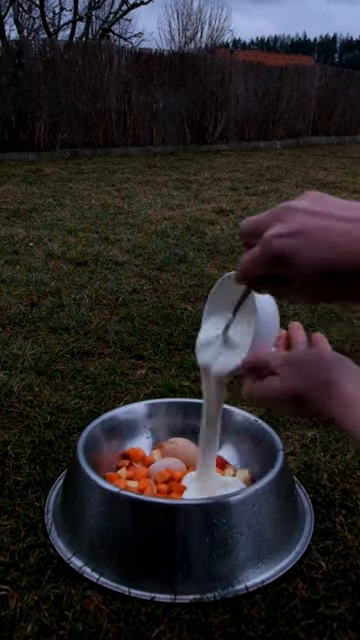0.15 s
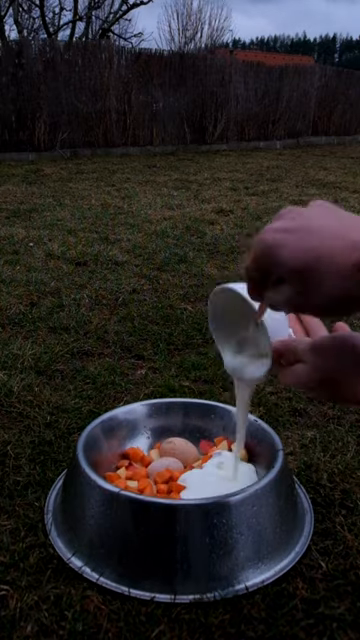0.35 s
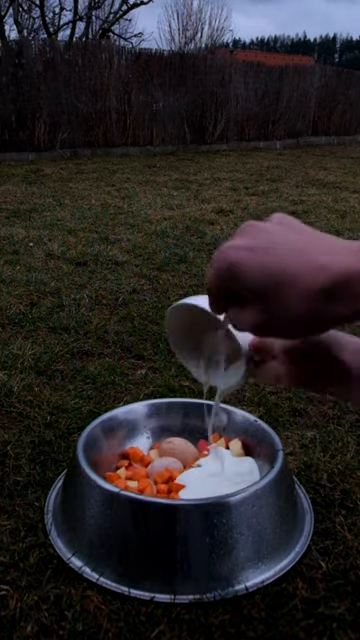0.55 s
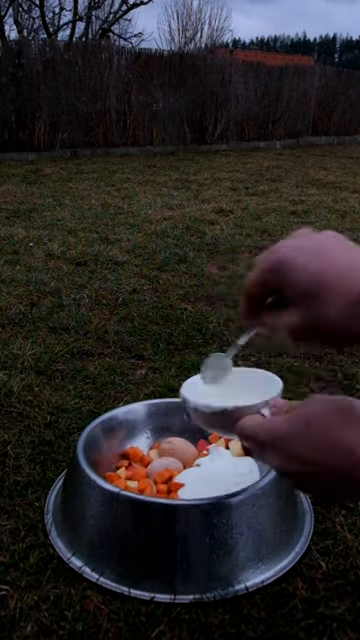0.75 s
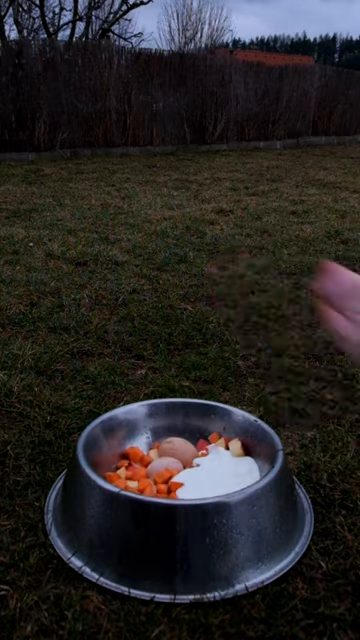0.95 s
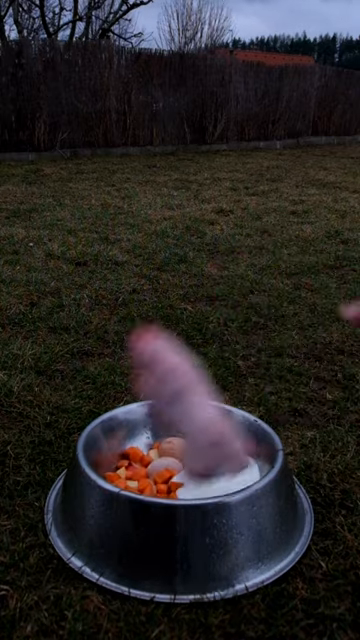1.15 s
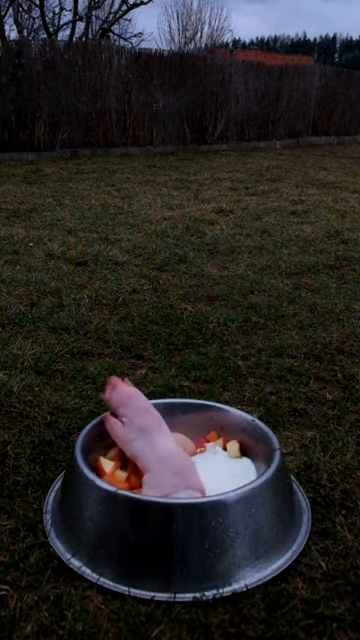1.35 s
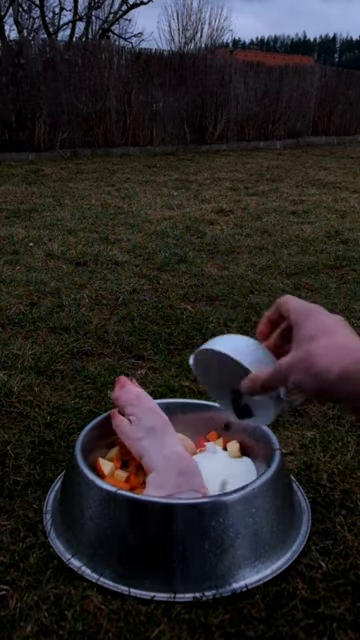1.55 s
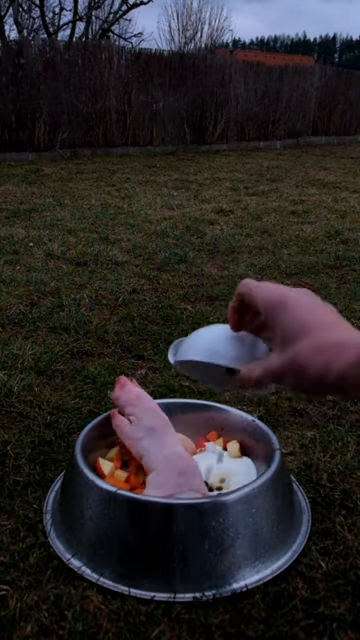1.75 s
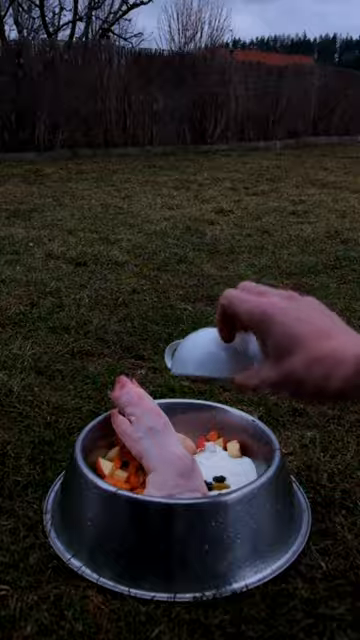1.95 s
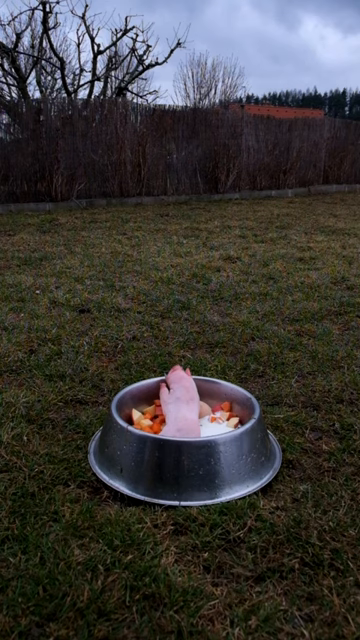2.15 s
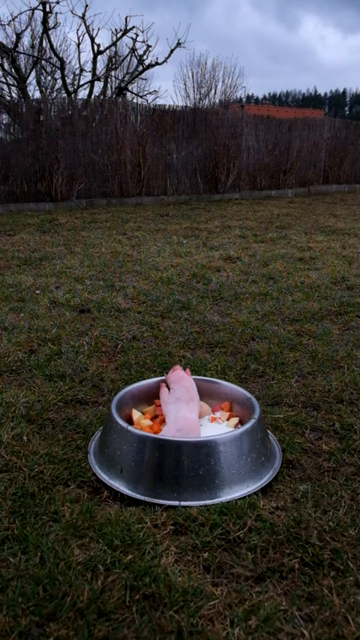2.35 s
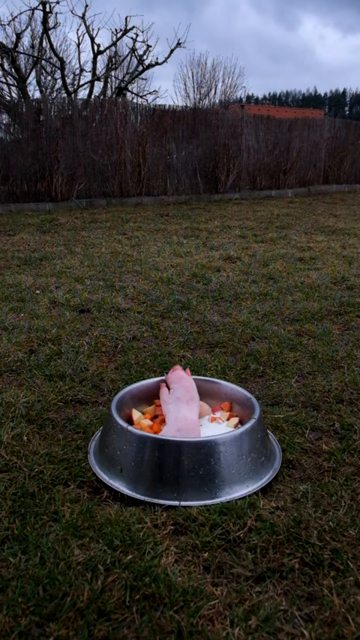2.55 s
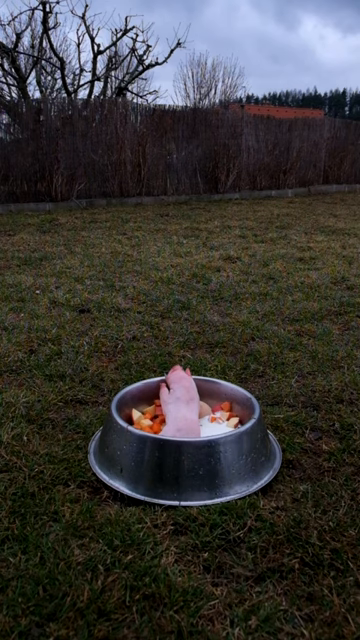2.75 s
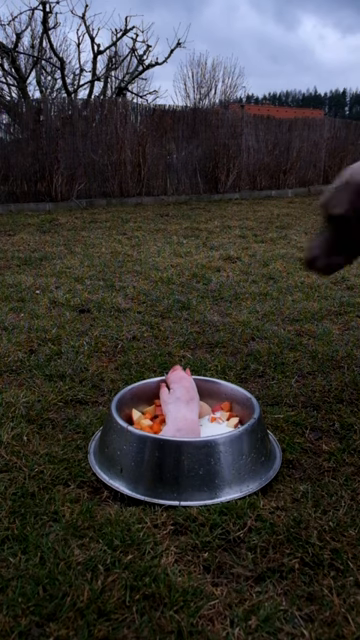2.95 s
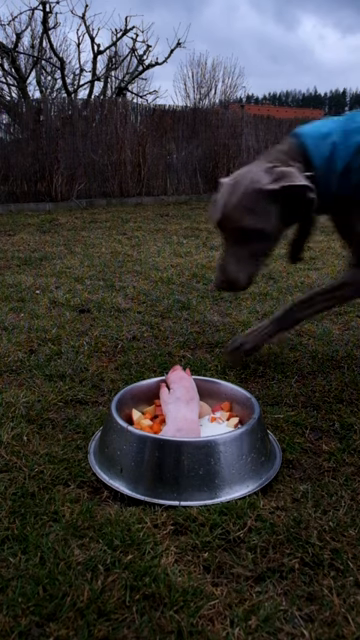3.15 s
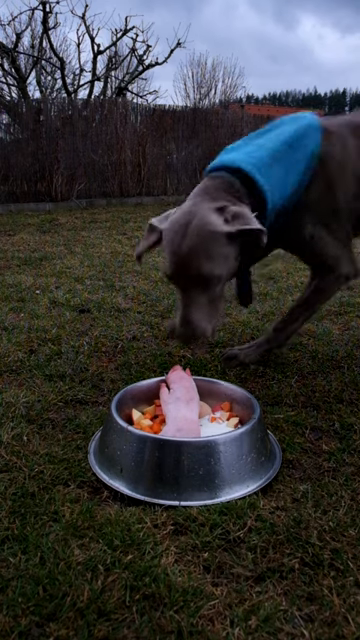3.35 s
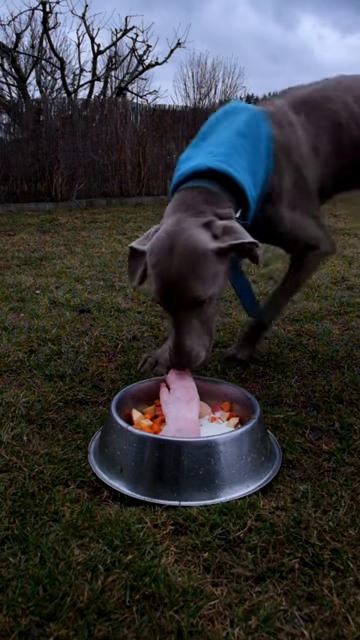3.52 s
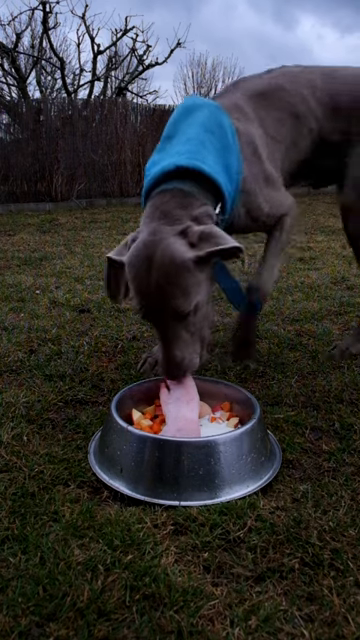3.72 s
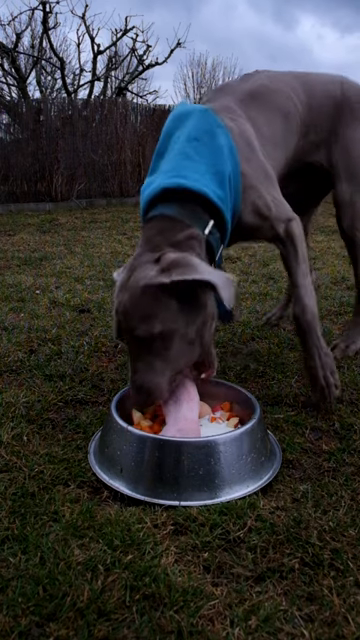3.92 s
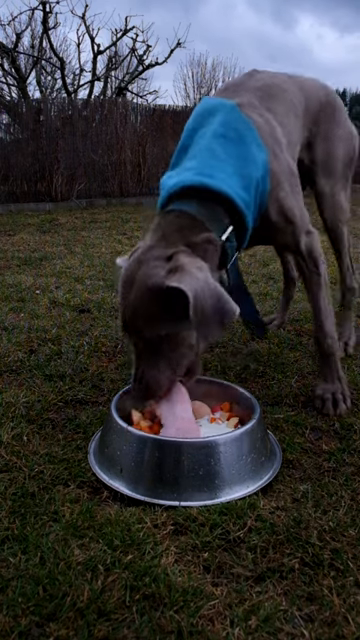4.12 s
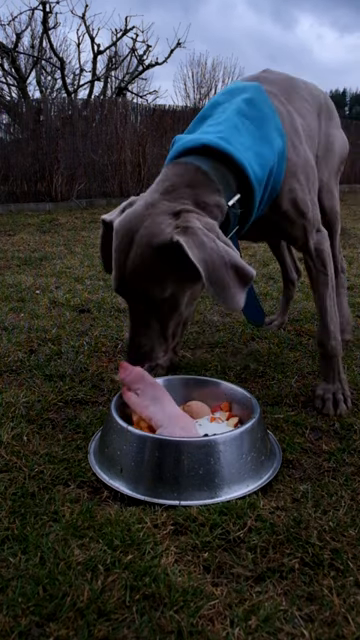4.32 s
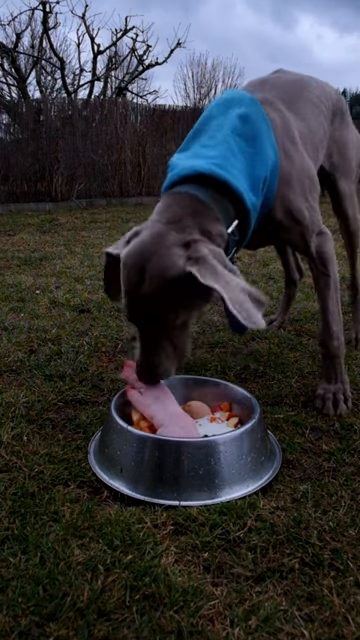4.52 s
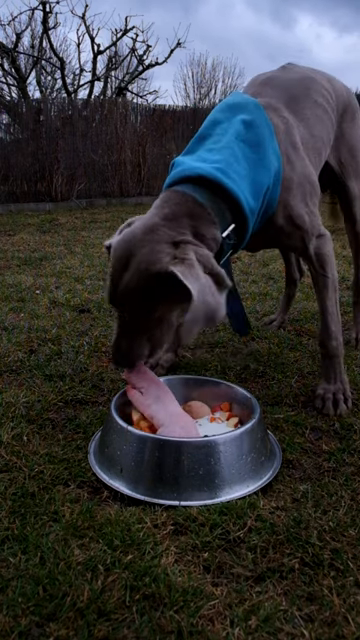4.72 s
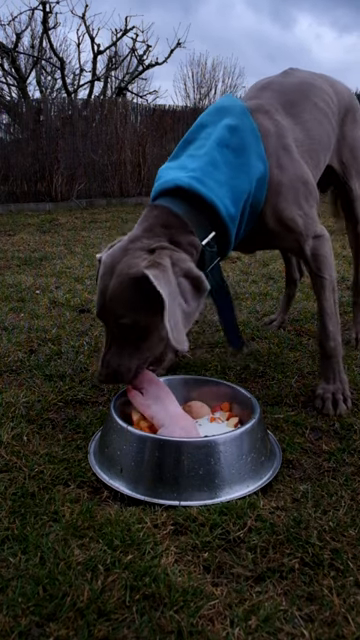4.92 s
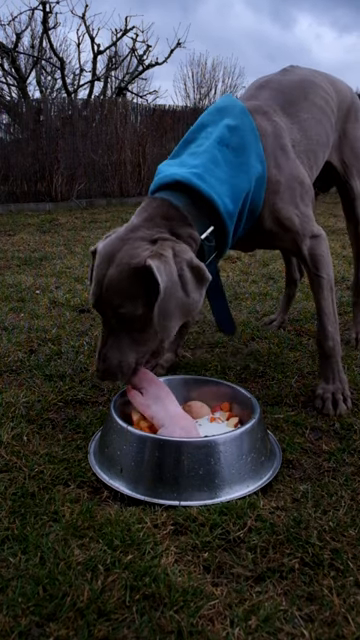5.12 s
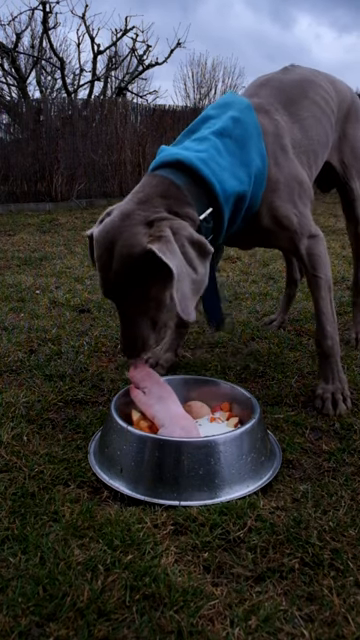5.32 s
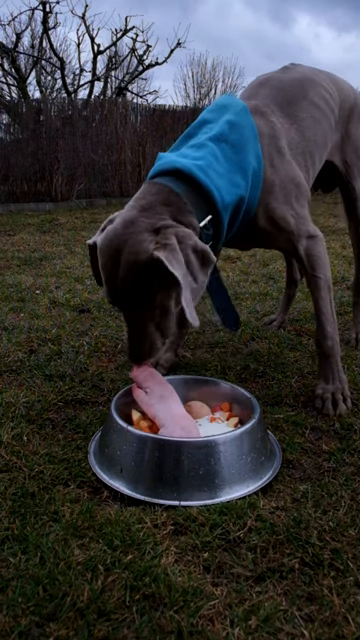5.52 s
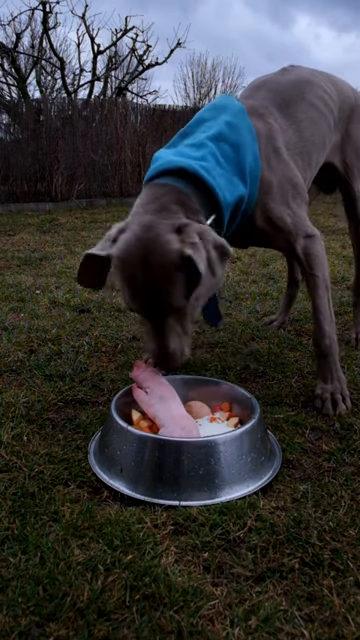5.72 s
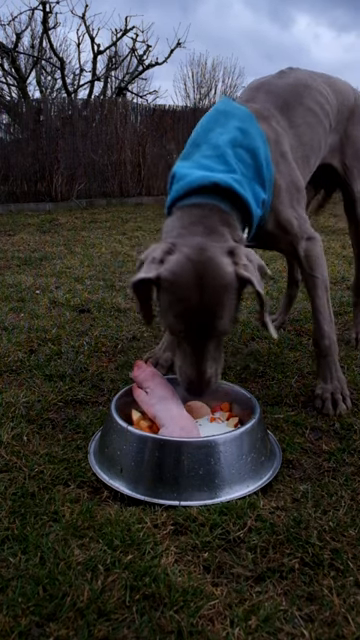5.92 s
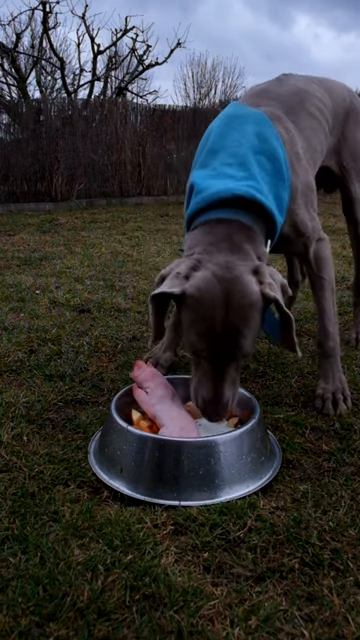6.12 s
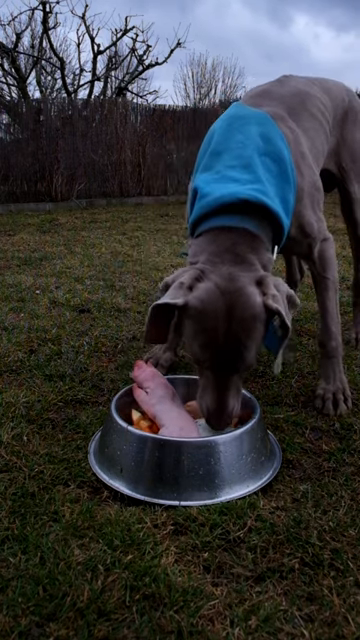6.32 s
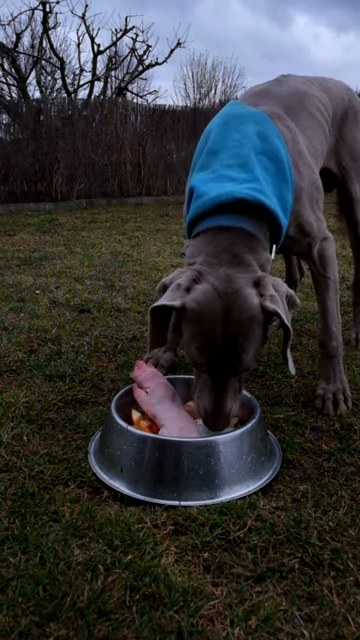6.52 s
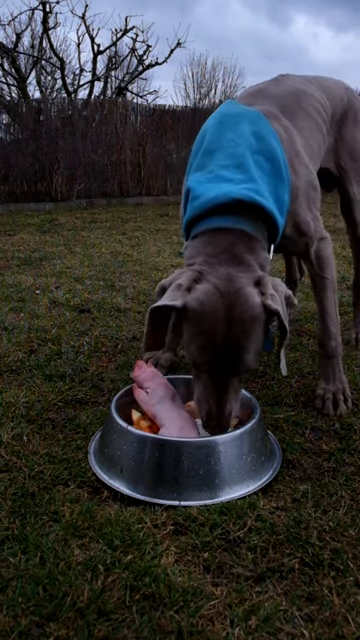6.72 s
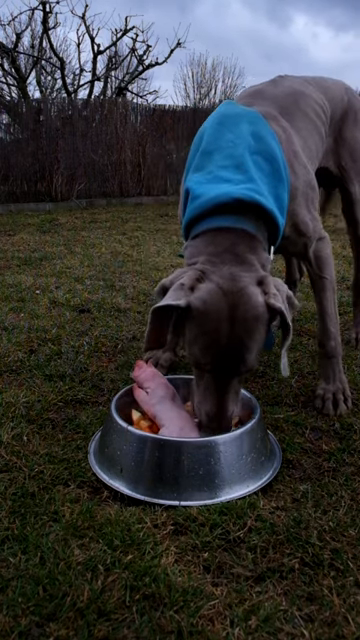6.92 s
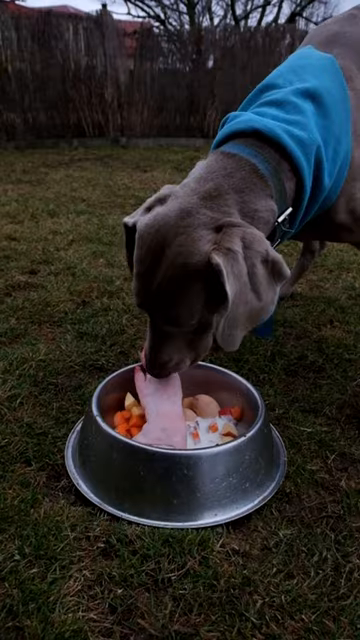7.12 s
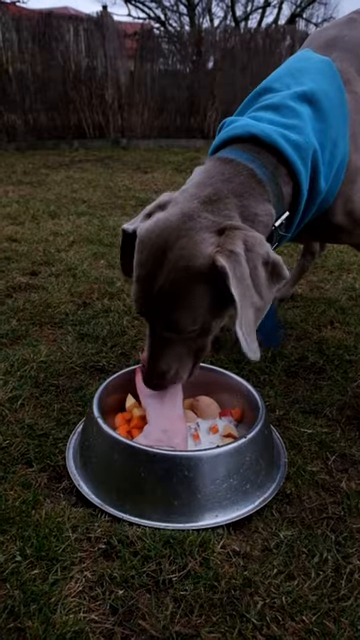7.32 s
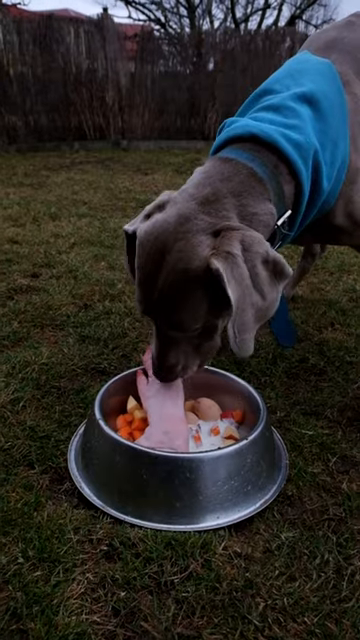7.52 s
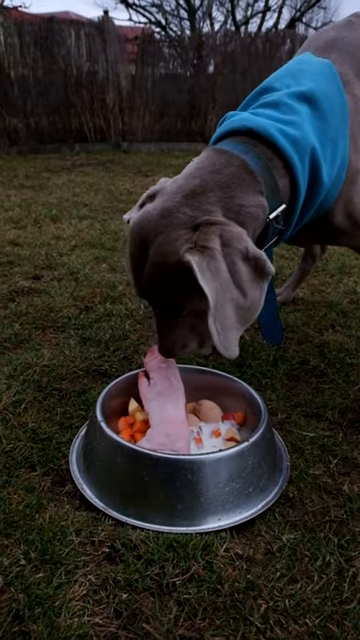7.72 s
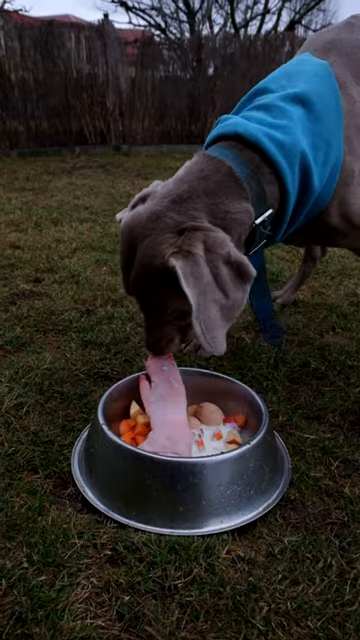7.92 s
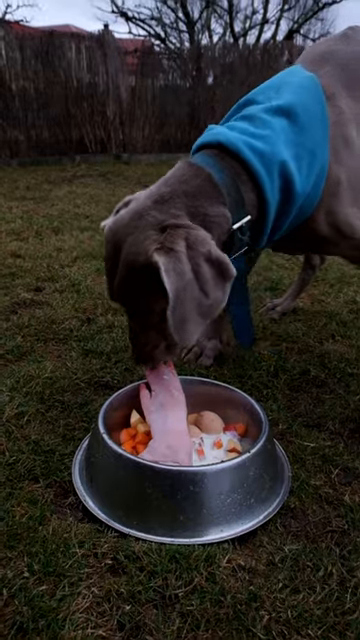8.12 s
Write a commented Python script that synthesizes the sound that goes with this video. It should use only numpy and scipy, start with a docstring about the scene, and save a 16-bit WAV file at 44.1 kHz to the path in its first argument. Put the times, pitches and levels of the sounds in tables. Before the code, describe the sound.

Close to the microphone on a lawn, a spoon scrapes out a cup amid puffs of wind. Meat thuds into a steel bowl and sets it ringing, berries tick against a cup, and something clips the rim. Feet scuff through the grass and snap dry stalks. Then a dog licks and chews with quiet, wet smacks, over a soft outdoor hiss and a few faint, distant bird chirps.

```python
"""On a lawn, close to a two-port microphone. A spoon scrapes out a cup, a lump of meat thuds into a
steel bowl and sets it ringing, berries tick against the cup as they tip in, and the rim is clipped.
Feet scuff through the grass and snap dry stalks; then a dog licks and chews in small wet pops.
Wind puffs right on the ports; far off, a few birds whistle over a soft hiss."""
import sys
import numpy as np
from scipy import signal
from scipy.fft import rfft, irfft, next_fast_len
from scipy.io import wavfile
from scipy.ndimage import uniform_filter1d

SR = 44100
rng = np.random.default_rng(int(sys.argv[2]) if len(sys.argv) > 2 else 0)


def dump_mix(stems):
    """Bounce the given channels to the path in sys.argv[1] as a 16-bit WAV at rate SR."""
    frames = np.atleast_2d(stems).T  # one column per channel
    limited = np.clip(frames, -1, 1)  # hard clip at full scale
    pcm = np.round(limited * 32767).astype(np.int16)
    wavfile.write(sys.argv[1], SR, pcm)


N = 364424

# the meat touches, lands, slides and rocks: t/s, force/dB, treble slap re force/dB, steel ring/dB
MEAT_CONTACT = [(1.195, -51, -3, -72), (1.203, -25, -35, -31), (1.221, -26, -30, -50),
                (1.225, -16.5, -8, -53), (1.235, -26.5, -9, -49), (1.255, -28.5, -4, -39),
                (1.262, -34, 4, -32), (1.275, -37, 5, -34), (1.31, -51, 5, -29.5), (1.36, -51, -21, -27.5),
                (1.7, -53, -19, -37)]
# the main blow of the landing: t/s, peak/dB
MEAT_BLOW = [(1.223, -3)]
# dull resonances of the landing: f/Hz, width/Hz, gain/dB
THUD_MODES = [(166, 19.5, 4), (335, 65, 15), (534, 47, 8), (903, 20, 7), (1120, 7.4, -1.5), (1430, 80, -23)]
# modes of the loaded steel bowl: f/Hz, level/dB, t60/s
BOWL_MODES = [(517, -5, 0.58), (1736, -12, .5), (1857, -24, 5.0), (1943, -10, 0.58), (1997, -5, 0.53),
              (2067, -12, 0.73), (2239, -15, 0.61), (2584, -13, 0.82), (2794, -22, 3.3), (2850, -13, .4),
              (3031, -8, 0.75), (3273, -8, 0.69), (3327, -14, 0.59), (3537, -18, 1.3), (3720, -17, 0.56),
              (3811, -18, 3.0), (3975, -15, .5), (4027, -18, 0.68), (4102, 0, 0.46), (4355, -13, 0.44),
              (5006, -15, 0.74), (5480, -15, 0.51), (6078, -7, 0.3), (6277, -18, 0.55), (6455, -27, 1.9)]


def meat_in_bowl():
    """Close by, the meat thuds down and keeps shaking the steel while it settles."""
    out, t = np.zeros(N), np.arange(4000) / SR
    s, force_db, slap_db, ring_db = curve(MEAT_CONTACT)
    force = amp(force_db) * rng.standard_normal(len(force_db))
    add(out, s, 1.24 * sum(amp(db) * resonate(force, hz, width + 100) for hz, width, db in THUD_MODES))
    add(out, s, broad(force * amp(slap_db), hz=4850, spread=1.3))
    add(out, s, amp(ring_db) * ring(BOWL_MODES, len(force), held_s=0.066))
    push = np.diff(np.exp(-(t / 0.00043 - 2.5) ** 2), prepend=0)  # slope of a brief contact pulse
    blow = sum(amp(db) * resonate(push, hz, width + 60) / width for hz, width, db in THUD_MODES)
    for s, db in MEAT_BLOW:
        add(out, s, amp(db) * blow / abs(blow).max())
    return out


# modes of the bowl's rim: f/Hz, relative level/dB, t60/s
RIM_MODES = [(2280, -22, 1.1), (3290, -12, 0.57), (3820, -30, 1.1), (5500, 13, 0.045), (5670, -4, 0.49),
             (5600, 5, 0.11), (5930, -21, 4.6), (5900, -6, 0.4), (6800, 6, 0.067), (8900, -2, 0.12),
             (9572, -9, 0.17), (10800, -7, 0.16), (11320, -35, 3.9), (11720, -37, 5.0), (12030, -24, 0.17),
             (12370, -19, 0.096)]
# the knock on the rim: t/s, relative level/dB
RIM_KNOCKS = [(2.0716, -10)]


def rim_knock():
    """Something hard clips the rim: a bright crack and a ring that is soon muffled."""
    out, t = np.zeros(N), np.arange(4000) / SR
    free_s = .078
    envelope = np.exp(-t / 0.0062) + 0.27 * np.exp(-t / 0.034) * (t < free_s)
    for s, db in RIM_KNOCKS:
        crack = rng.standard_normal(len(t)) * envelope
        add(out, s, amp(db - 5.0) * broad(crack, hz=7000, spread=0.36))
        add(out, s, amp(db - 25.5) * damped(RIM_MODES, free_s))
    return out


# spoon strokes along the cup wall: t/s, peak/dB, brightness/dB
SPOON_STROKES = [(0.3424, -20, -22), (0.3555, -32, -27), (.3787, -33, -12), (0.396, -25.5, -20),
                 (0.4557, -19, -12.5), (0.5486, -13.5, -21.5), (0.5889, -19, -15.5), (0.613, -15, -19.5),
                 (0.6594, -17, -17)]
# resonances of the cup wall under the spoon: f/Hz, width/Hz, gain/dB
CUP_MODES = [(1206, 400, -0.5), (1836, 210, 7), (2410, 210, 2.5), (3100, 510, 4), (4440, 90, 5),
             (5240, 780, 1), (5820, 170, -3), (6530, 150, 0), (7210, 190, 1), (8010, 630, -6),
             (9980, 730, -9), (11480, 210, -5), (11990, 290, -4), (12970, 270, -17), (13900, 300, -25)]


def spoon():
    """Swells of rough friction sound through the cup wall, so wide and close that the ports differ."""
    out, t = np.zeros((2, N)), np.arange(-400, 1400) / SR
    rise_s, fall_s = 0.0041, 0.0034
    swell = np.exp(np.minimum(t / rise_s, -t / fall_s))
    for s, db, bright_db in SPOON_STROKES:
        grit = alike(*rng.standard_normal((2, len(t))) * swell, likeness=0.1)
        wall = 0.5 * broad(grit, hz=7600, spread=0.18) * amp(bright_db)
        for hz, width, mode_db in CUP_MODES:
            gain = amp(mode_db + (bright_db + 17) * (hz > 6000))
            wall += gain * resonate(resonate(grit, hz, width + 150), hz, width + 150)
        add(out, s + 0.0042 + t[0], amp(db) * wall / abs(wall.mean(0)).max())
    return out


# single modes of cup, spoon and bowl: f/Hz, t60/s, touches as (t/s, time ringing free/s, level/dB)
DISH_RINGS = [(518, 0.18, [(1.266, 0.054, -20)]), (880, 0.024, [(1.467, 0.014, -22)]),
              (1260, 0.069, [(1.685, 0.045, -30)]), (1750, 0.31, [(.36, 0.06, -49), (.52, 0.062, -36),
              (.62, 0.016, -32), (.645, 0.016, -25.5)]), (2320, 0.19, [(.46, 0.04, -37),
              (.865, .045, -43)]), (2600, 0.43, [(.4, 0.066, -42), (.47, 0.025, -39)]),
              (2690, 0.14, [(1.685, 0.037, -27.5)]), (3060, 0.64, [(.51, 0.072, -38.5),
              (.555, 0.07, -36.5)]), (3062, 0.59, [(.7, .235, -32), (.937, 0.22, -37.5)]),
              (3274, .5, [(1.228, .03, -33), (1.264, .046, -28)]), (6850, .8, [(.376, 0.02, -37),
              (.42, 0.016, -57), (.475, 0.053, -37)]), (7960, 0.056, [(.508, .04, -30), (.645, .02, -42),
              (.702, .04, -24), (.937, .06, -31)]), (8100, 0.057, [(.862, .03, -34)]),
              (11300, .08, [(.862, .025, -45)]), (12600, .12, [(.378, .016, -48), (.487, .03, -50),
              (.862, .02, -56)])]


def dish_rings():
    """Slips and touches leave single modes ringing until a hand or the spoon damps them."""
    out = np.zeros(N)
    for hz, t60, touches in DISH_RINGS:
        for s, free_s, db in touches:
            add(out, s, damped([(hz, db, t60)], free_s))
    return out


# berries striking the small cup: t/s, body/dB, crackle/dB
BERRY_TICKS = [(1.738, -23.5, -28), (1.76, -24, -29), (1.769, -28, -16.5), (1.794, -32, -48),
               (1.818, -35, -49), (1.934, -28, -21.5)]


def berries():
    """Small hard ticks on one note of the cup."""
    out = np.zeros((2, N))
    for s, db, crackle_db in BERRY_TICKS:
        add_pop(out, s, db, hz=3190, t60=0.013, crackle_db=crackle_db, crackle_hz=6700,
                spread=.9, fall_s=.0007, pan_db=2, click=0.21, rise_s=0.00039)
    return out


# wet smacks of tongue, lips and jaw: t/s, pop/dB, cavity f/Hz, t60/s, crackle/dB, crackle f/Hz
MOUTH_SMACKS = [(4.03, -33, 645, 0.013, -61, 2910), (4.052, -35, 535, 0.06, -48, 3330),
                (4.067, -36, 770, 0.042, -50, 1860), (4.083, -44.5, 1250, 0.044, -46, 2900),
                (4.127, -48, 293, .019, -45, 2900), (4.201, -39, 1210, .017, -45, 1600),
                (4.209, -28, 688, .029, -41.5, 1870), (4.24, -40, 680, .034, -53, 1810),
                (4.291, -27, 652, 0.026, -33.5, 1900), (4.3, -21, 367, .03, -40, 3050),
                (4.332, -40, 514, 0.045, -58, 1740), (4.607, -40, 750, 0.018, -43, 1790),
                (4.763, -40, 900, 0.0088, -48, 1700), (4.878, -28, 1120, 0.0055, -49, 1940),
                (4.887, -34, 370, 0.022, -59, 2440), (5.119, -25.5, 605, 0.01, -40, 1870),
                (5.124, -43, 676, 0.05, -44, 1880), (5.834, -51, 307, .021, -46, 2210),
                (5.922, -32, 1414, 0.026, -37, 1560), (5.928, -39, 1340, .042, -44, 1680),
                (6.015, -44, 1390, .025, -50, 1600), (6.45, -36, 870, 0.027, -58, 2760),
                (6.484, -39, 328, 0.021, -34.5, 2690), (6.524, -49, 627, .025, -45, 2710),
                (6.543, -43, 755, .02, -47, 2100), (6.616, -29.5, 1120, 0.0092, -36.5, 1780),
                (6.678, -45, 223, 0.028, -42, 2080), (6.772, -42, 880, 0.13, -39, 2240),
                (6.795, -36, 857, 0.041, -49, 1890), (6.805, -40, 820, 0.044, -42, 1380),
                (6.85, -42, 654, 0.043, -50, 1500), (6.815, -39.5, 352, 0.018, -48, 2880),
                (6.953, -41, 940, .019, -46, 3300), (6.985, -44, 252, .019, -45, 1890),
                (7.06, -41, 2010, .02, -29.5, 2260), (7.064, -36, 2700, 0.022, -37.5, 2800),
                (7.085, -35, 1070, 0.033, -35, 2870), (7.091, -40, 810, 0.058, -36.5, 2700),
                (7.253, -48, 237, 0.014, -39, 3020), (7.439, -24.5, 244, 0.038, -58, 2220),
                (7.464, -37, 266, .025, -62, 2250), (7.746, -42, 340, 0.078, -53, 2090),
                (7.874, -56, 390, .022, -47, 3650), (7.917, -22, 273, 0.023, -59, 1720),
                (8.105, -45, 1490, .019, -35, 1960)]


def dog_mouth():
    """Near the microphone, wet surfaces part and small cavities pop, among many faint crackles."""
    out, first_s = np.zeros((2, N)), 3.3
    wet = dict(pan_db=-1.5, click=0.28, rise_s=0.00033)
    faint_draws = rng.random((200, 3))
    for smack in MOUTH_SMACKS:
        add_pop(out, *smack, spread=0.29, fall_s=0.0034, **wet)
    for when, strength, pitch in faint_draws:
        s = first_s + when * (N / SR - first_s)
        db, hz = -55 + 11 * strength ** 2, 900 * 10 ** pitch
        add_pop(out, s, db - 6, hz / 3, t60=.012, crackle_db=db, crackle_hz=hz,
                spread=.9, fall_s=.0015, **wet)
    return out


# feet and paws in the grass: t/s, length/s, hiss/dB, hiss change by the end/dB, crunch/dB
GRASS_SCUFFS = [(2.171, 0.04, -41.5, -15, -44), (2.216, .02, -36.5, -20, -62), (2.298, 0.035, -28, -4, -40),
                (2.343, 0.028, -45, -15, -51), (2.371, 0.013, -41.5, 1, -48), (2.417, 0.011, -40, 6, -37),
                (2.435, 0.035, -26.5, -11, -34), (2.499, 0.044, -34, -4, -33), (2.556, .03, -41, -22, -45),
                (2.584, 0.0095, -34, -19, -59), (2.625, 0.02, -24, -7.5, -39.5),
                (2.65, 0.062, -25.5, -12.5, -39), (2.761, 0.052, -53.5, 7, -39.5),
                (3.657, 0.065, -61.5, -7, -54.5), (3.98, 0.23, -64, -17, -60),
                (4.297, 0.054, -74, -4, -57.5), (4.6, 0.072, -74, -9, -58), (6.444, 0.54, -83, 11, -64),
                (8.196, 0.094, -76, 4, -53)]
# sleeves and grass as someone moves about: t/s, hiss/dB, crunch/dB
SOFT_RUSTLE = [(0, -57, -61), (.14, -53, -57), (.36, -70, -67), (.54, -66, -51), (.67, -47, -41.5),
               (.72, -64, -44.5), (.81, -70, -82), (.935, -49, -45.5), (.99, -57, -60), (1.01, -45.5, -46),
               (1.1, -52.5, -51.5), (1.195, -40, -40.5), (1.225, -51, -64), (1.33, -43.5, -43),
               (1.61, -46.5, -46), (1.75, -51.5, -52), (2.07, -51.5, -52), (2.165, -66, -64),
               (2.31, -51, -76), (2.52, -50, -49), (2.63, -60, -59), (2.8, -53, -49.5), (3.045, -58.5, -45),
               (3.075, -43, -40.5), (3.146, -39.5, -34.5), (3.19, -49, -46), (3.3, -72, -60),
               (3.48, -65, -62), (3.62, -84, -72)]
# spectra of a scuff's hiss, the rustle's hiss and the lower crunch of both: f/Hz, density/dB
SCUFF_SPECTRUM = [(2060, -42), (3500, -36), (4540, -18), (5070, -7.5), (7570, -4.5), (10500, -12),
                  (15800, -29.5), (16500, -56)]
RUSTLE_SPECTRUM = [(2060, -65), (3500, -13), (6440, 1.5), (10100, -2.5), (15400, -30), (16200, -36),
                   (16500, -64)]
CRUNCH_SPECTRUM = [(300, -34), (550, -15), (1400, -2), (2400, -0.5), (4200, -2.5), (6500, -6.5),
                   (11000, -66)]
# the body shades the left port: f/Hz, left minus right/dB
BODY_SHADOW = [(300, -1), (2500, -2), (4500, -2), (7000, -5.5), (10000, -15.5), (15000, -9.5)]


def grass():
    """Blades brush in dense grains; a scuff starts and stops at once, the soft rustle drifts."""
    hiss, crunch, soft_hiss, soft_crunch = np.zeros((4, N))
    attack_s, release_s, weight_s = 0.0033, 0.0062, 0.004
    for s, length, db, change_db, crunch_db in GRASS_SCUFFS:
        t = np.arange(0, length + .05, 1 / SR)
        gate = np.minimum(t / attack_s, 1) * np.exp(-np.maximum(t - length, 0) / release_s)
        weight = 1 - np.exp(-t / weight_s)  # the crunch builds as the foot takes weight
        add(hiss, s, amp(db + change_db * t / length) * gate)
        add(crunch, s, amp(crunch_db) * weight * gate)
    s, hiss_db, crunch_db = curve(SOFT_RUSTLE)
    add(soft_hiss, s, amp(hiss_db))
    add(soft_crunch, s, amp(crunch_db))
    likeness = [(900, 1.0), (12000, 0.077)]
    grains = waver(db=3.9, seconds=0.0051) * waver(db=0.37, seconds=0.0056)
    scuffs = hiss * noise(SCUFF_SPECTRUM, likeness) + crunch * noise(CRUNCH_SPECTRUM, likeness)
    rustle = soft_hiss * noise(RUSTLE_SPECTRUM, likeness) + soft_crunch * noise(CRUNCH_SPECTRUM, likeness)
    rustle *= waver(db=1.26, seconds=0.0073)
    return (ports(*scuffs * grains, lag=4.1, balance=BODY_SHADOW)
            + ports(*rustle, lag=0.43, balance=[(900, 1.1), (12000, -2.1)]))


# dry stalks in the lawn: t/s, body/dB, body f/Hz, crackle/dB, crackle f/Hz
STALK_SNAPS = [(.952, -23.5, 1770, -36, 4000), (2.166, -25.5, 1070, -38, 8210),
               (2.179, -19.5, 1680, -22, 5770), (2.215, -30, 1530, -31, 8560),
               (2.278, -42, 1440, -29, 7100), (2.332, -16, 1010, -31, 5770), (2.385, -24, 1120, -39, 7990),
               (2.4255, -2, 1770, -27, 6500), (2.4269, -17, 2520, -6.5, 8400),
               (2.503, -11, 1940, -19, 8630), (2.807, -19, 3300, -37, 5640),
               (2.842, -16.5, 3070, -21.5, 6700), (2.919, -15.5, 3040, -25, 4450),
               (2.975, -23.5, 2000, -45, 4800), (2.995, -33, 2150, -24.5, 6760),
               (3.484, -31, 2200, -23.5, 4400), (3.546, -35, 810, -61, 5460), (3.662, -46, 2600, -37, 5500),
               (3.704, -49, 1550, -42, 4170), (3.985, -41, 891, -29, 9400)]


def stalks():
    """Dry stalks snap with a very short crackle."""
    out = np.zeros((2, N))
    for s, db, hz, crackle_db, crackle_hz in STALK_SNAPS:
        add_pop(out, s, db, hz, t60=0.0045, crackle_db=crackle_db, crackle_hz=crackle_hz,
                spread=0.53, fall_s=.0007, pan_db=-4, click=0.49, rise_s=0.0002)
    return out


# heels landing on the turf: t/s, level/dB, final f/Hz, t60/s
HEEL_THUMPS = [(2.366, -28.5, 112.4, 0.042), (2.502, -20.5, 112, 0.032)]


def heels():
    """A thump whose pitch drops as the foot sinks in."""
    out, t = np.zeros(N), np.arange(4000) / SR
    for s, db, hz, t60 in HEEL_THUMPS:
        phase = 2 * np.pi * np.cumsum(hz * (1 + 3.7 * np.exp(-t / 0.0069))) / SR
        envelope = amp(db - 60 * t / t60) * (1 - np.exp(-t / 0.0021))
        add(out, s, envelope * np.sin(phase))
    return out


# gusts on the microphone; the last row is just a faint low rumble where the background drops out:
# t/s, hold/s, level/dB, left minus right/dB, sharpness/0-1
RUMBLES = [(.13, .035, -53, 12, 0.3), (0.238, 0.047, -52, 21, 0.5), (0.402, 0.043, -48, 19.5, 0.08),
           (0.487, .015, -42, 10, 0), (0.54, 0.02, -39.5, 25.5, 0.64), (0.626, .015, -43.5, 13, 0.7),
           (0.666, 0.025, -31, 21, 1), (0.711, 0.027, -32.5, 1, 0.53), (0.772, 0.013, -33.5, 20.5, 1),
           (0.81, 0.0053, -45, 12, 0.6), (0.835, .015, -41, 11, 0.65), (0.848, 0.01, -39, -13, 0.54),
           (.92, .02, -56, 14, 0.2), (1.813, .01, -61, -6, 0.6), (1.883, .035, -56, -17, 0),
           (2.187, 0.04, -49, 0, 0.35), (2.362, .028, -44, -5, 0.84), (2.51, 0.031, -40.5, -3, 0.13),
           (2.625, .04, -55, -2.5, 0), (2.75, 0.082, -55, -6, 0.2), (2.894, 0.035, -60, -1, 0.1),
           (7.086, 0.11, -58, 1, .3)]


def wind():
    """Lumpy rumble, unrelated on each port; each swell holds and drops, and sharp ones reach higher."""
    out, t = np.zeros((2, N)), np.arange(N) / SR
    rise_s, fall_s = 0.0092, 0.0089
    likeness = [(20, 0.013), (900, 0.008)]
    low = noise([(15, -16), (60, 0), (110, -2), (250, -40)], likeness)
    high = noise([(50, -14), (140, -0.5), (300, -11.5), (800, -27), (1500, -74)], likeness)
    low, high = steadied(low, seconds=0.093), steadied(high, seconds=0.093)
    for s, hold, db, pan_db, sharp in RUMBLES:
        span = (t > s - .1) & (t < s + hold + .1)
        age = t[span] - s
        swell = np.exp(np.minimum(age / rise_s, 0) - np.maximum(age - hold, 0) / fall_s)
        rumble = np.sqrt(1 - sharp) * low[:, span] + np.sqrt(sharp) * high[:, span]
        out[:, span] += amp(db) * pan(pan_db) * swell * rumble
    return out


# distant birds: t/s, length/s, start f/Hz, end f/Hz, level/dB, upper octave re level/dB
BIRD_CHIRPS = [(5.07, .055, 5060, 5050, -60.5, -40), (5.288, 0.052, 3660, 3570, -61.5, 3),
               (5.46, 0.058, 4140, 3730, -59, -40), (5.723, .04, 6100, 6000, -65, -40)]


def birds():
    """Short, slightly falling whistles from far away."""
    out = np.zeros(N)
    for s, length, start_hz, end_hz, db, octave_db in BIRD_CHIRPS:
        phase = 2 * np.pi * np.cumsum(np.linspace(start_hz, end_hz, round(length * SR))) / SR
        whistle = np.sin(phase) + amp(octave_db) * np.sin(2 * phase)
        add(out, s, amp(db) * whistle * signal.windows.tukey(len(phase), .6))
    return out


# spectrum of the far-off hiss: f/Hz, density/dB
FAR_SPECTRUM = [(18, -50), (30, -6), (201, -0.5), (577, -4.5), (625, -5), (792, -6), (928, -8.5),
                (1090, -9), (1180, -9.5), (1490, -11), (3970, -17.5), (15200, -32.5), (16500, -73)]
# how alike it is on the two ports: f/Hz, correlation
FAR_LIKENESS = [(60, 0.26), (180, 0.21), (550, 0.36), (1650, 0.36), (4970, -0.06), (15000, 0.57)]
# its lean to the right: f/Hz, left minus right/dB
FAR_BALANCE = [(60, -2), (180, -2), (550, -1.5), (1650, -1.5), (4970, -0.5), (15000, -2.5)]
# background level, which dips under the strongest gusts and drops out briefly near 7.13 s: t/s, gain/dB
BACKGROUND_GAIN = [(0, 0.5), (.2, 4), (.25, 1), (.7, -5), (.76, -3), (.84, -0.5), (.92, 1), (2.1, -1),
                   (3.3, 0), (3.6, -3), (7.1, -3.5), (7.125, -7), (7.14, -12), (7.165, -3.5), (8.26, -2)]


def far_hiss():
    """The background beyond the lawn: a soft hiss that wavers a little."""
    level_db = -48.5 + np.interp(np.arange(N) / SR, *np.transpose(BACKGROUND_GAIN))
    flutter = waver(db=.7, seconds=.04) * waver(db=.5, seconds=.2)
    hiss = ports(*noise(FAR_SPECTRUM, FAR_LIKENESS), lag=0.72, balance=FAR_BALANCE)
    return hiss * amp(level_db) * flutter


def amp(db):
    return 10 ** (np.asarray(db) / 20)


def pan(db):
    return amp([[db / 2], [-db / 2]])


def unit_rms(x):
    return x / np.sqrt(np.mean(x ** 2) + 1e-20)


def over_log_hz(points, hz):
    f, value = np.transpose(points)
    return np.interp(np.log(hz + 1), np.log(f + 1), value)


def add(mix, s, sound):
    part = mix[..., round(s * SR):][..., :sound.shape[-1]]
    part += sound[..., :part.shape[-1]]


def curve(rows):
    """The start time, then every other column drawn out to the sample rate."""
    s, *columns = np.transpose(rows)
    t = np.arange(s[0], s[-1], 1 / SR)
    return s[0], *(np.interp(t, s, column) for column in columns)


def resonate(x, hz, width):
    """One resonance, width in Hz, with a peak gain near 1."""
    radius = np.exp(-np.pi * width / SR)
    return 2 * signal.lfilter([1 - radius], [1, -radius * np.exp(2j * np.pi * hz / SR)], x).real


def broad(x, hz, spread):
    """A wide resonance applied twice; spread is its width as a share of its pitch."""
    return resonate(resonate(x, hz, spread * hz), hz, spread * hz)


def ring(modes, size, held_s=0):
    """Sines of random phase, driven for held_s and then dying away."""
    t = np.arange(size) / SR
    decay_s = np.maximum(t - held_s, 0)
    return sum(amp(db - 60 * decay_s / t60) * np.sin(2 * np.pi * (hz * t + rng.random()))
               for hz, db, t60 in modes)


def damped(modes, free_s):
    """A ring that rises in a few ms and is muffled after free_s."""
    t = np.arange(round((free_s + .03) * SR)) / SR
    return ring(modes, len(t)) * (1 - np.exp(-t / .003)) * np.exp(-np.maximum(t - free_s, 0) / .006)


def add_pop(mix, s, db, hz, t60, crackle_db, crackle_hz, spread, fall_s, pan_db, click, rise_s):
    """A small body or cavity rings briefly under a short crackle."""
    t = np.arange(2500) / SR
    impulse = 1. * (t == 0)
    snap = 0.37 * impulse + rng.standard_normal(len(t)) * np.exp(-t / fall_s)
    crackle = unit_rms(broad(snap, crackle_hz, spread))
    crackle += click * unit_rms(broad(impulse, hz=4500, spread=0.9))  # thin click of parting surfaces
    body = np.sin(2 * np.pi * hz * t) * amp(-60 * t / t60) * (1 - np.exp(-t / rise_s))
    sound = amp(db) * body + amp(crackle_db) * crackle / abs(crackle).max()
    add(mix, s + 0.001005, pan(pan_db) * sound)


def waver(db, seconds):
    """A random gain that wavers by so many dB over so many seconds."""
    return amp(db * unit_rms(uniform_filter1d(rng.standard_normal(N), round(seconds * SR))))


def steadied(x, seconds):
    """Evens out the slow swings of a noise so that it follows its envelope."""
    return x / np.sqrt(abs(uniform_filter1d(x ** 2, round(seconds * SR))) + 0.056)


def alike(a, b, likeness):
    """Blends two unrelated noises into a pair whose correlation is likeness."""
    return np.array([a, likeness * a + np.sqrt(1 - likeness ** 2) * b])


def noise(spectrum, likeness):
    """A noise for each port, from points of (f/Hz, density/dB) and (f/Hz, correlation)."""
    size = next_fast_len(N)
    hz = np.fft.rfftfreq(size, 1 / SR)
    pair = alike(*rfft(rng.standard_normal((2, size))), np.clip(over_log_hz(likeness, hz), 0, 1))
    return unit_rms(irfft(amp(over_log_hz(spectrum, hz)) * pair, size)[:, :N])


def ports(left, right, lag, balance):
    """The left port hears lag samples later; balance lists (f/Hz, left minus right/dB)."""
    size = next_fast_len(N)
    hz = np.fft.rfftfreq(size, 1 / SR)
    tilt = amp(over_log_hz(balance, hz) / 2)
    delay = np.exp(-2j * np.pi * hz * lag / SR)
    return irfft(np.array([rfft(left, size) * tilt * delay, rfft(right, size) / tilt]), size)[:, :N]


def scene():
    """Everything on the lawn as it reaches the two ports."""
    low_cut = signal.butter(2, 85, "high", fs=SR, output="sos")  # cuts sub-bass the resonators let through
    mono = dish_rings() + signal.sosfilt(low_cut, meat_in_bowl() + rim_knock()) + birds()
    mix = ports(mono, mono, lag=1.97, balance=[(500, 1.0), (3000, -3.0), (8000, -8.5)]) + spoon()
    mix += ports(*berries(), lag=2.3, balance=[(500, 19.0), (8000, -13.0)])
    mix += ports(*(stalks() + heels()), lag=4.9, balance=[(500, 0.5), (3000, 0.5), (8000, -5.5)])
    mix += ports(*dog_mouth(), lag=1.35, balance=[(500, 0.17), (8000, -1.5)])
    return mix + grass() + wind() + far_hiss()


def record(dry):
    """The loudest peaks are squashed at a soft ceiling, then the top of the treble is cut."""
    ceiling, edge_hz = .92, 16300
    squashed = dry / (1 + abs(dry / ceiling) ** 4) ** .25
    low_pass = signal.firwin(511, edge_hz, window=("kaiser", 9), fs=SR)
    return signal.oaconvolve(squashed, low_pass[None], "same")


dry = scene()
out = record(dry)
dump_mix(out)
```